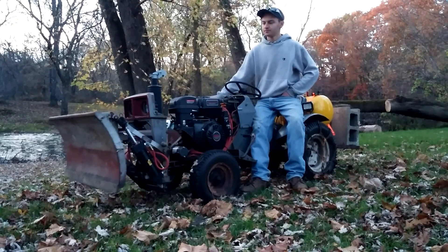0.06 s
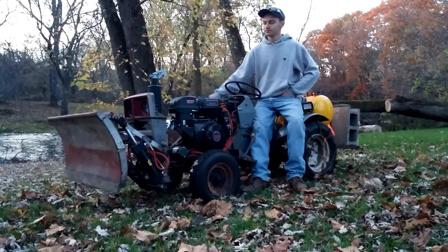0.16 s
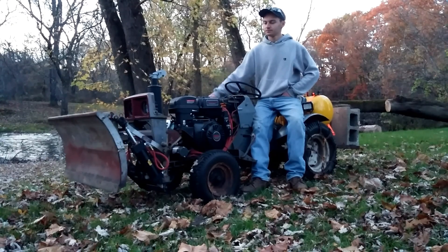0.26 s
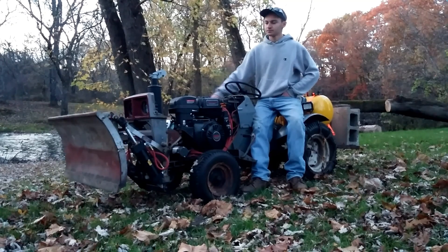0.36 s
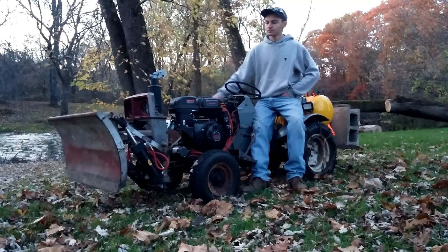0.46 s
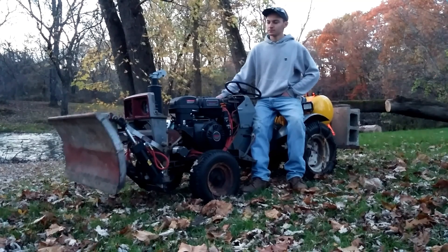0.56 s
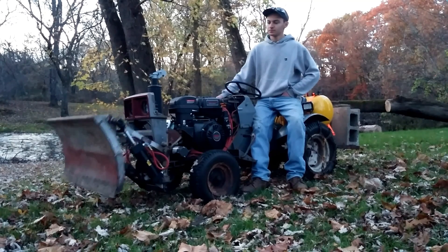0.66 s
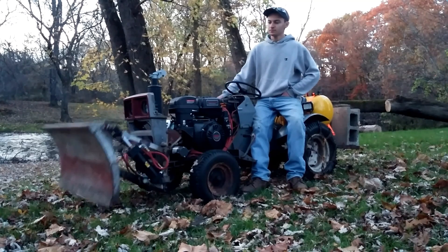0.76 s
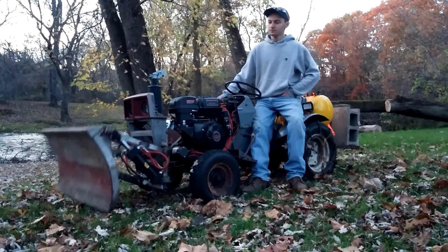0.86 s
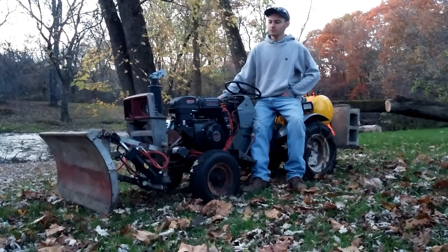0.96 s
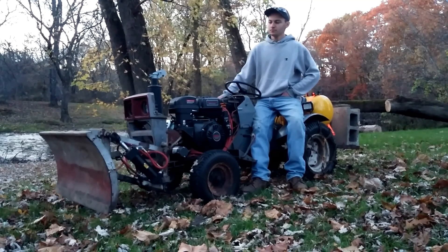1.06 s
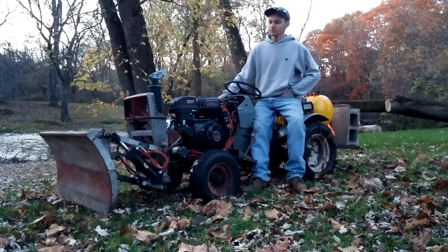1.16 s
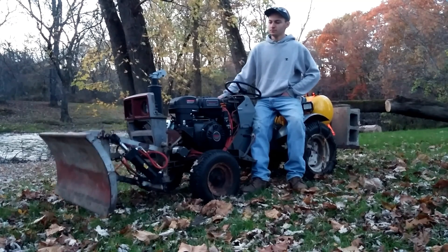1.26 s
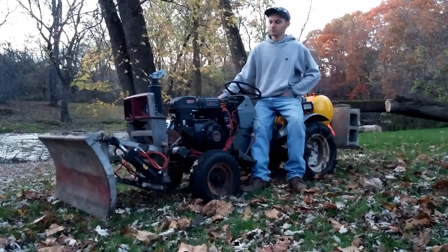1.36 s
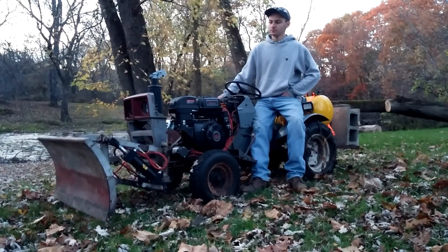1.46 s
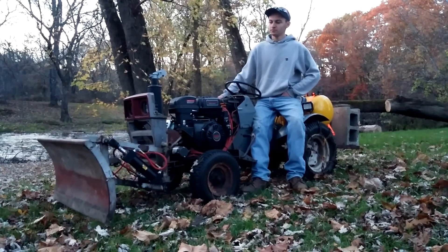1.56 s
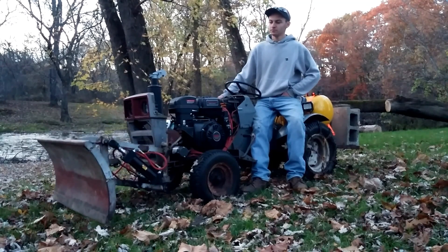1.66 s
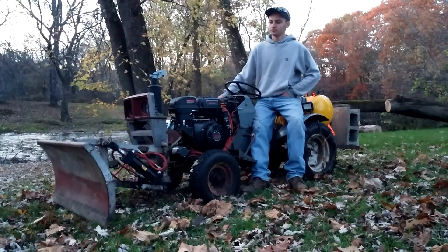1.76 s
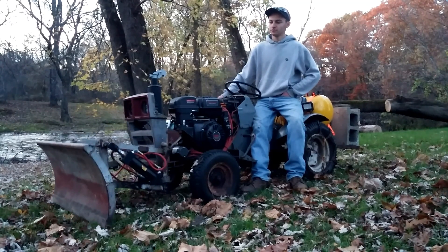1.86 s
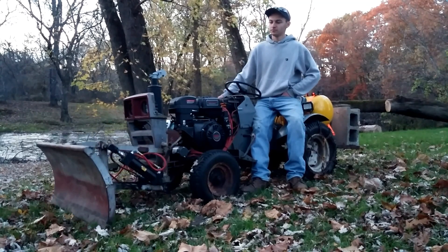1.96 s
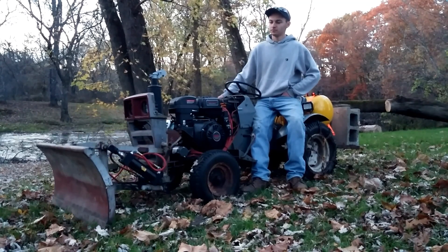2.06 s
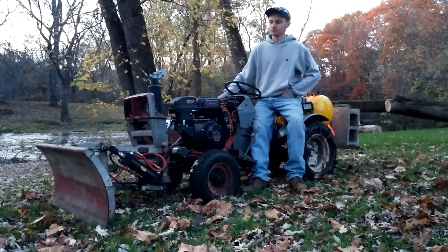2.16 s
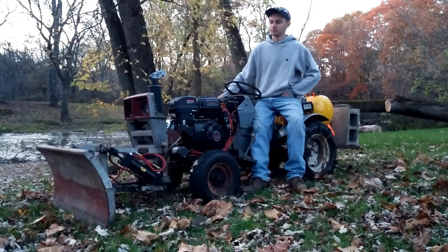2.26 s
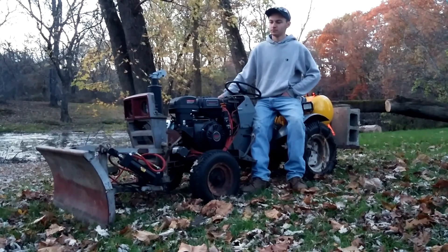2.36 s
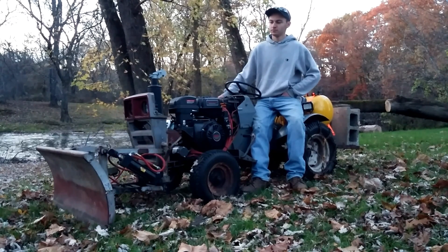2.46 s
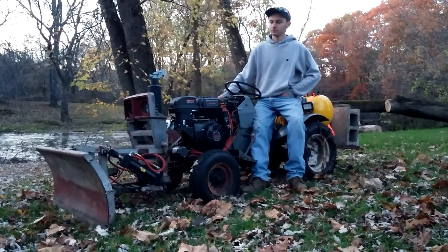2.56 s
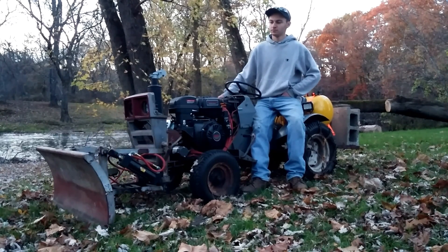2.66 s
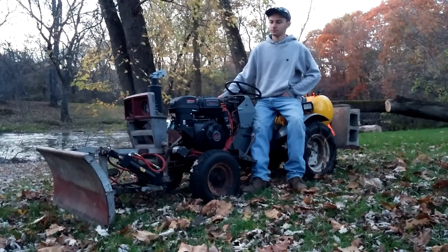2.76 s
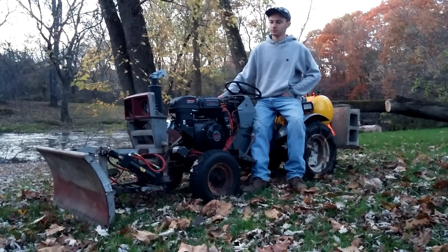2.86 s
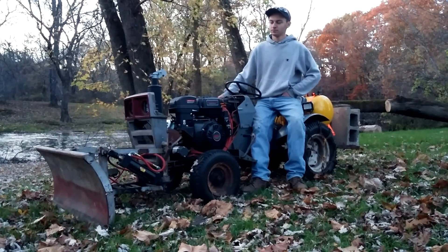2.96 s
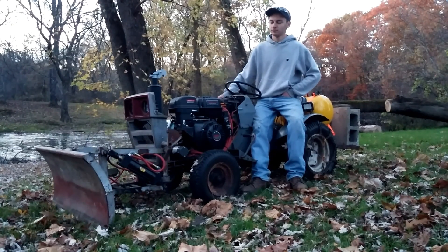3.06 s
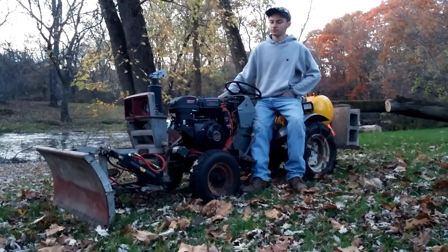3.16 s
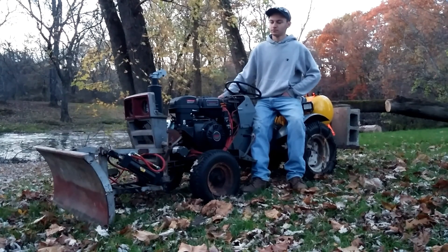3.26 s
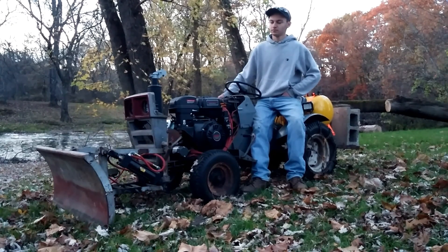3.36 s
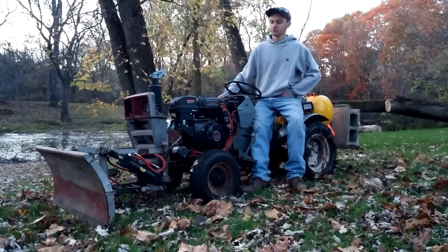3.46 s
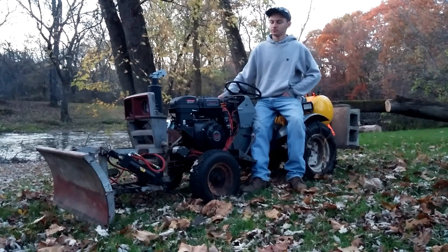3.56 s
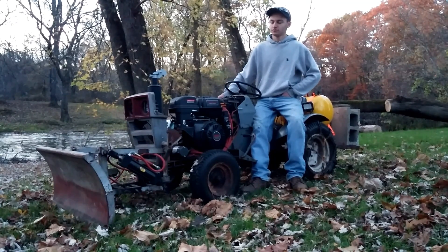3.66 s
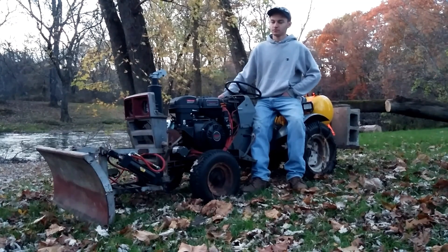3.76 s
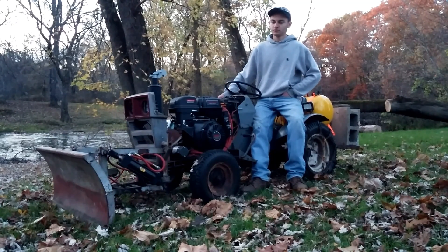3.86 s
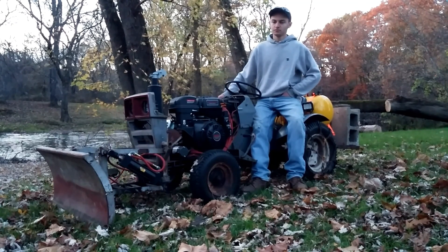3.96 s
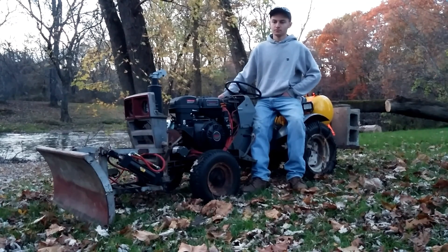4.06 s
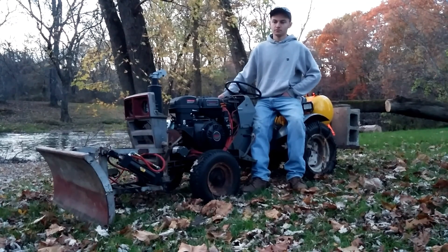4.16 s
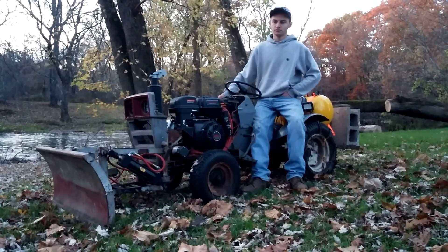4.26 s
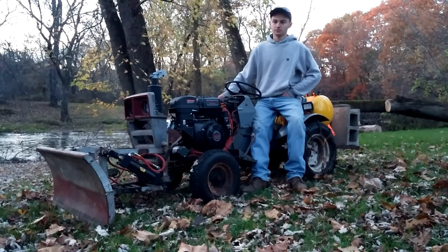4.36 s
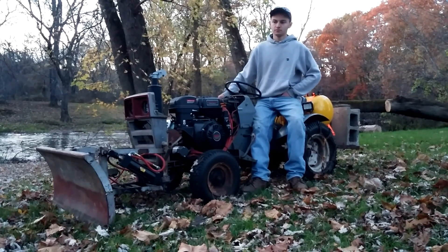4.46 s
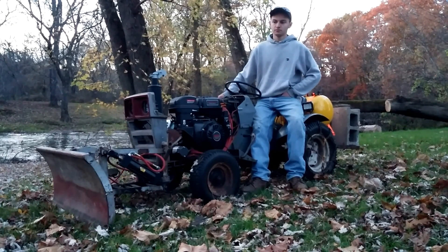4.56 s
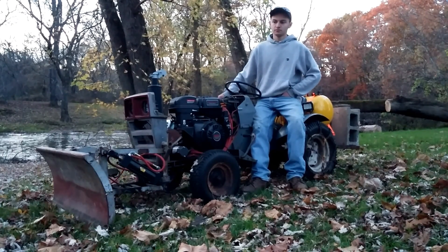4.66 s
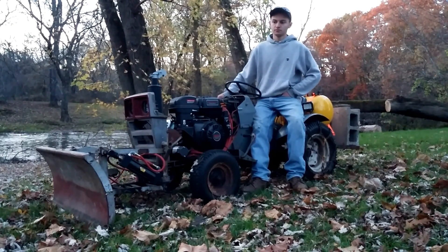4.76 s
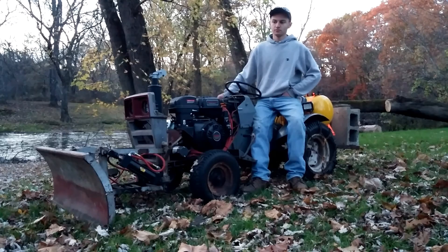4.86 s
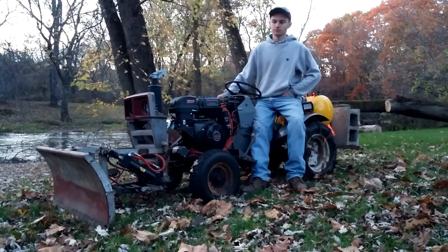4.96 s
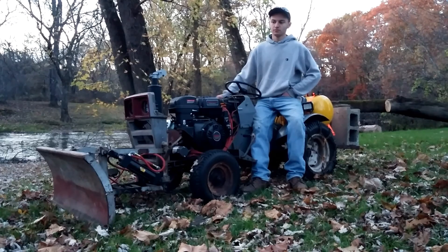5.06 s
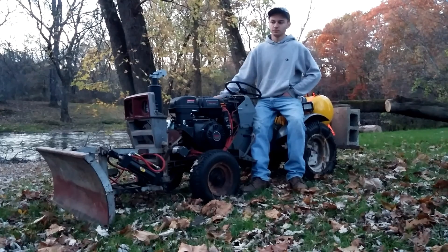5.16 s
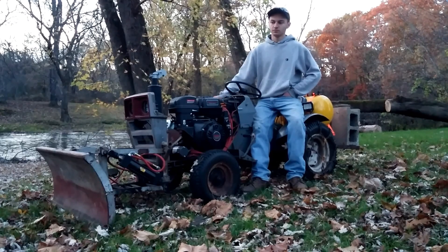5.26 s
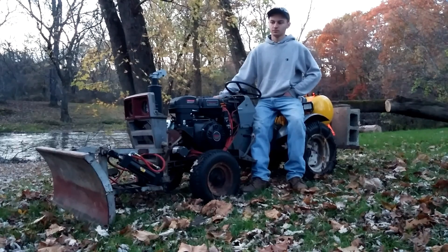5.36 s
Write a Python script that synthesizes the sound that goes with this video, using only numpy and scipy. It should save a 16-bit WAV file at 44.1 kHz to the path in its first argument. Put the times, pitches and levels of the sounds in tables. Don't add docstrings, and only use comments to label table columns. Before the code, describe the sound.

Close to a mono microphone in a wooded yard, a brief air hiss comes with sharp metal linkage clanks. A long, bright, whistly exhaust hiss follows, with duller knocks, then the steel blade lands hard and bounces in quickening, weakening bumps. A faint rubber rub ends the motion. The hiss fades away, leaving low distant traffic, wind and leaves, until a light knock and a fresh burst of air.

```python
import sys
import numpy as np
from scipy import signal
from scipy.fft import rfft, irfft, next_fast_len
from scipy.io import wavfile

SR = 44100
rng = np.random.default_rng(int(sys.argv[2]) if len(sys.argv) > 2 else 0)


def boost_factor(decibels):
    exponent = np.asarray(decibels, float) / 20
    return 10 ** exponent


def inscribe(sig):
    pcm = np.round(np.clip(np.atleast_2d(sig).T, -1, 1) * 32767)
    wavfile.write(sys.argv[1], SR, pcm.astype(np.int16))


N = 238845
CUTOFF_HZ = 15500

# (time [s], level [dB])
RUMBLE = [(0.0, -53.5), (0.69, -54), (1.27, -54.5), (2.1, -52), (3.4, -55), (3.8, -51.5), (4.5, -51),
          (5.0, -49), (5.42, -50)]


def rms_one(x):
    return x / np.sqrt(np.mean(x ** 2) + 1e-20)


def in_time(rows):
    s, *columns = np.transpose(rows)
    return [np.interp(np.arange(N) / SR, s, c) for c in columns]


def at_hz(points, hz, column=1):
    points = np.array(points)
    return np.interp(np.log(hz), np.log(points[:, 0]), points[:, column])


def decay(t60):
    return boost_factor(-60 / (t60 * SR))


def drift(rate_hz):
    r = np.exp(-2 * np.pi * rate_hz * 40 / SR)
    draws = rng.standard_normal(N // 40 + 2002)
    slow = signal.lfilter([1], [1, -2 * r, r * r], draws)[2000:]
    return np.interp(np.arange(N) / 40, np.arange(len(slow)), rms_one(slow))


def noise_bands(gain_of_hz, low_hz, count, length=N):
    size = next_fast_len(length)
    hz = np.arange(1, size // 2 + 2) * SR / size
    whole = rfft(rng.standard_normal(size)) * gain_of_hz(hz)
    step = np.log(CUTOFF_HZ / low_hz) / (count - 1)
    for centre in np.geomspace(low_hz, CUTOFF_HZ, count):
        away = abs(np.log(np.minimum(hz, CUTOFF_HZ) / centre)) / step
        yield centre, irfft(whole * np.clip(1 - away, 0, 1), size)[:length]


def ring(clicks, hz, t60):
    r, w = decay(t60), 2 * np.pi * hz / SR
    return signal.lfilter([0, np.sin(w)], [1, -2 * r * np.cos(w), r * r], clicks + 1e-18)


def yard():
    # (frequency [Hz], level [dB per Hz])
    yard_colour = [(15, -70), (25, -32.5), (75, 2), (169, -5.5), (215, -4.5), (398, -3.5), (507, -6),
                   (682, -22.5), (916, -9), (1700, -16), (2110, -17), (2910, -18.5), (3420, -26),
                   (3910, -26.5), (15400, -50.5)]
    traffic_db, middle_db, steady_db = 1.3, 0.5, -50.5
    low_db, = in_time(RUMBLE)

    def colour(hz):
        notch = 0.31 * np.exp(-((hz - 603) / 123) ** 2)
        return boost_factor(at_hz(yard_colour, hz)) * (1 - notch)

    gust, out, low = drift(2.6), 0, 0
    for hz, band in noise_bands(colour, low_hz=25.8, count=18):
        lumpy_db = np.interp(np.log(hz), np.log([300, 3000]), [2.6, 1.8]) * (0.25 * gust + drift(12))
        share_db = traffic_db * (170 < hz < 700) + middle_db * (700 < hz < 3200)
        share_db = share_db + (steady_db - low_db) * (hz > 3200)
        out = out + band * boost_factor(lumpy_db + share_db)
        low = low + band * (50 < hz < 160)
    return boost_factor(low_db + 1.07) * out / np.std(low)


def rustles(count):
    level_db, puff_s, spread_db = -9.5, 0.052, 2.5
    t = np.arange(int(puff_s * SR)) / SR
    out = np.zeros(N + SR)
    for when, pitch, glide, size in rng.random((count, 4)):
        hz = 850 * (3100 / 850) ** pitch * (1 + 0.1 * (glide - 0.5) * t / puff_s)
        size_db = -spread_db * np.log(1 - 0.95 * size)
        start = int(when * N)
        out[start:start + len(t)] += boost_factor(size_db) * np.hanning(len(t)) * np.sin(2 * np.pi * hz * t)
    return boost_factor(in_time(RUMBLE)[0] + level_db) * out[:N]


def seal():
    # (start [s], length [s], level [dB])
    drags = [(2.278, 0.16, -54), (2.46, 0.27, -52.5)]
    t = np.arange(N) / SR
    rubbing = sum(boost_factor(db) * np.sin(np.pi * np.clip((t - s) / length, 0, 1)) for s, length, db in drags)
    return rubbing * rms_one(ring(rng.standard_normal(N), hz=2560, t60=0.018))


def thump():
    t = np.maximum(np.arange(N) / SR - 0.175, 0)
    return boost_factor(-30.5 - 60 * t / 0.4) * (1 - np.exp(-t / 0.016)) * np.sin(2 * np.pi * 97 * t)


def jet(blast, flow_db, spectrum, peaks, port_db, patchy_db):
    opens, shuts, core_db, low_db, top_db = blast
    t = np.arange(N) / SR
    after = np.maximum(t - shuts, 0)
    opening = 1 - np.exp(-(np.maximum(t - opens, 0) / 0.0062) ** 2)
    closing = np.exp(-after / 0.018)
    hose_drain = boost_factor(-22.5) * np.exp(-after / 0.097)
    seat_leak = boost_factor(-28) * np.exp(-after / 0.91)
    valve = opening * (closing + hose_drain + seat_leak)

    low_db = low_db + np.clip(0.9 * (flow_db + 4.5), -9, 0)
    top_db = top_db - 0.0061 * flow_db
    lags_s = 0.012 * rng.random(8)

    def colour(hz):
        ports = 1 + sum(boost_factor(2 * (db + port_db)) / (1 + (2 * (hz - f) / wide) ** 2) for f, wide, db in peaks)
        paths = 1 + boost_factor(-17) * sum(np.exp(-2j * np.pi * hz * lag) for lag in lags_s)
        return boost_factor(at_hz(spectrum, hz)) * np.sqrt(ports) * paths

    bands = list(noise_bands(colour, low_hz=2200, count=12))
    core = np.std(sum(band for hz, band in bands if 6000 < hz < 9500))
    surge, out = drift(27.0), 0
    for hz, band in bands:
        low = np.interp(hz, [4800, 6000], [1, 0])
        top = np.interp(hz, [9000, 10500], [0, 1])
        edge_db = low * (low_db + 8.5) + top * (top_db + 3.5)
        wavering_db = patchy_db * (0.5 - 1.2 * top) * (0.38 * surge + drift(49.0))
        out = out + band * boost_factor(edge_db + wavering_db)
    return valve * boost_factor(core_db + flow_db) * out / core


def air():
    # (opens [s], shuts [s], core [dB], low edge [dB re core], top [dB re core])
    openings = [
        (-0.05, 0.13, -33.5, -8, 0.5),
        (0.695, 4.8, -32.5, -6, -4.5),
        (5.349, 5.5, -30, -10, 1.5),
    ]
    # (time [s], level [dB re full flow])
    emptying = [(0.7, -2), (1.22, 1), (1.4, -0.25), (2.62, 0.35), (3.07, -1.5), (3.86, -13.5), (4.31, -23),
                (4.65, -35.5), (4.8, -57)]
    # (frequency [Hz], level [dB per Hz])
    fill_colour = [(1470, -69), (2500, -44), (2910, -24), (3410, -22), (3680, -18.5), (4280, -5.5),
                   (5370, -9.5), (5970, -4.5), (7900, -1.5), (10700, -12), (15200, -13)]
    # (frequency [Hz], level [dB per Hz])
    exhaust_colour = [(1470, -29), (2500, -19.5), (2680, -16), (3180, -26.5), (4940, -5.5), (5620, -9),
                      (6100, -5), (7660, -6.5), (8330, -1), (9120, -7), (10800, -9), (11600, -7.5),
                      (12600, -8), (13600, -8), (15200, -4.5)]
    # (frequency [Hz], level [dB per Hz])
    refill_colour = [(1470, -41), (2500, -15), (3230, -15), (3880, -9.5), (5370, -7.5), (8390, -2.5),
                     (10600, -13.5), (11600, -14), (15200, -14.5)]
    # (frequency [Hz], width [Hz], level [dB])
    port = [(3600, 120, -1), (4170, 220, -7), (5400, 50, -37.5), (5300, 190, -9.5), (5860, 240, -4),
            (6320, 260, -6), (6870, 120, -3), (7520, 450, -3.5), (8416, 275, -1), (9190, 52, -0.5),
            (10200, 38, -25), (10270, 88, -4.5), (10900, 110, -6), (11400, 180, -5), (11800, 65, -12),
            (12500, 64, -17), (12400, 170, -15), (13300, 89, -5), (13600, 160, -12), (13700, 220, -8),
            (14800, 86, -22), (14800, 95, -28)]
    fill, exhaust, refill = openings
    out = jet(fill, 0, fill_colour, [], port_db=0, patchy_db=1.1)
    out = out + jet(refill, 0, refill_colour, [], port_db=0, patchy_db=1.1)
    return out + jet(exhaust, in_time(emptying)[0], exhaust_colour, port, port_db=9.0, patchy_db=0.98)


def struck(hits, modes, clatter, low_hz, high_hz, mode_db, clatter_db, spread_db, rise_s, favour_db):
    s, db, body_db, bright_db, rattle_s, near_hz = np.transpose(hits)
    first = int(s[0] * SR) - 10
    size = min(N, round((s[-1] + 1.2) * SR)) - first
    starts = np.round(s * SR).astype(int) - first
    t = np.arange(int(0.045 * SR)) / SR
    ragged_hz = 170
    noise = rng.standard_normal((len(hits), len(t)))
    luck = rng.standard_normal((len(hits), len(modes)))
    bunching = rng.standard_normal(int(SR / 2 / ragged_hz) + 2)
    shape = (1 - np.exp(-t / rise_s)) * np.exp(-t / np.maximum(rattle_s, 0.0015)[:, None])

    def blows(hz, extra_db, grain, ringing):
        body = np.interp(np.log(hz), np.log([low_hz / 2.15, low_hz]), [1, 0])
        bright = np.interp(np.log(hz), np.log([high_hz, high_hz * 1.4]), [0, 1])
        near_db = favour_db * np.exp(-(np.log(hz / near_hz) / 0.13) ** 2)
        level_db = db + body * body_db + bright * bright_db + near_db + extra_db
        force = grain * shape
        tuned = ringing * abs(force @ np.exp(2j * np.pi * hz * t))
        drive = np.hypot(tuned, np.linalg.norm(force, axis=1))
        train = np.zeros(size + len(t))
        for start, push in zip(starts, force * (boost_factor(level_db) / drive)[:, None]):
            train[start:start + len(t)] += push
        return train[:size]

    out = np.zeros(size)
    for k, (hz, level_db, t60) in enumerate(modes):
        grain = 0.99 * np.cos(2 * np.pi * (hz * t + luck[:, k:k + 1])) + noise
        out += ring(blows(hz, mode_db + level_db + spread_db * luck[:, k], grain, True), hz, t60)

    def colour(hz):
        ragged_db = 3 * np.interp(hz / ragged_hz, np.arange(len(bunching)), bunching)
        return boost_factor(at_hz(clatter, hz) + ragged_db)

    far = decay(0.77)
    for hz, band in noise_bands(colour, low_hz=145, count=14, length=size):
        r = decay(at_hz(clatter, hz, column=2))
        power = blows(hz, clatter_db, 1, False) ** 2 + 1e-18
        steel = signal.lfilter([1], [1, -r * r], power)
        trees = boost_factor(2 * -22) * signal.lfilter([1], [1, -far * far], power)
        out += band * np.sqrt(steel + trees)
    out = signal.sosfilt(signal.butter(3, [170, 12000], "band", fs=SR, output="sos"), out)
    return np.pad(out, (first, N - first - size))


def linkage():
    # (time [s], peak [dB], body [dB re
    # peak], # bright [dB re peak], loudest pin [Hz])
    clanks = [(0.1661, -11.5, 2, 1.5, 6700), (.1745, -9, 1, -2.5, 4250), (0.217, -34.5, 17.5, 1, 6500),
              (0.233, -38.5, 20, -2, 4120), (0.3173, -28, 5, 3, 2400), (0.3479, -13.5, -1.5, -2, 5440),
              (0.3528, -16.5, -27, -2.5, 8100), (.356, -16.5, -13, -13, 2200), (0.576, -32, -30, 1.5, 4600),
              (.695, -42.5, 5.5, 10, 1300), (0.828, -36, -2, -20, 412), (0.895, -20, 3.5, -19.5, 1384),
              (.903, -20, -6, -18, 1500), (0.926, -31, -13, -23, 1440)]
    # (frequency [Hz], level [dB], t60 [s])
    links = [(233.5, -12, 0.29), (269.4, -18, 0.41), (332, -13.5, 0.33), (391.5, -3, 0.31),
             (450, -10, 0.15), (872, -18, 0.39), (1055, -12.5, 0.12), (1300, -5, 0.11), (1680, -4.5, 0.084),
             (1620, -23, 0.096), (1990, -12, 0.14), (2244, -0.5, 0.049), (2390, -24, 0.085),
             (2670, -9, 0.074)]
    # (frequency [Hz], level [dB], t60 [s])
    pins = [(3900, -9, .05), (4100, -6, .07), (4300, -10, .04), (4600, -11, .035), (4970, -9, .045),
            (5150, -9, .05), (5400, -7, .06), (5650, -9, .045), (5900, -10, .035), (6300, -11, .03),
            (6800, -9, .03), (7100, -8, .035), (7400, -9, .03), (7800, -10, .03), (8200, -11, .025)]
    # (frequency [Hz], level [dB], t60 [s])
    link_clatter = [(149, -13, 0.6), (360, -0.5, 0.38), (643, -27, 0.62), (1110, -7.5, 0.18),
                    (2400, -7.5, 0.15), (4400, -16.5, 0.13), (7800, -28.5, 0.031), (9750, -30.5, 0.022),
                    (15000, -43, 0.034)]
    gaps = np.diff([row[0] for row in clanks] + [np.inf])
    hits = []
    for (s, db, body, bright, hz), gap in zip(clanks, gaps):
        rattle_s = 0.0038 if bright < -12 else 0.0016 if gap < 0.012 else 0.0045
        hits.append((s, db, body, bright, rattle_s, hz))
    return struck(hits, links + pins, link_clatter, low_hz=860, high_hz=3050, mode_db=-10, clatter_db=8.5,
                  spread_db=5.0, rise_s=0.00015, favour_db=14.5)


def blade():
    # (time [s], peak [dB])
    landings = [(1.7125, -13), (1.921, -29), (2.046, -14.5), (2.131, -17.5), (2.212, -19.5), (2.298, -21.5),
                (2.368, -26.5), (2.427, -31.5), (2.484, -33.5), (2.547, -33.5), (2.629, -42),
                (5.321, -36.5)]
    # (frequency [Hz], level [dB], t60 [s])
    panel = [(270, -12, .25), (325, -10, .25), (393, -7, .3), (445, -10, .2), (510, -12, .2),
             (624, -14, .25), (715, -14, .15), (797, -7, .22), (845, -17, .2), (920, -13, .2),
             (1035, -10, .15), (1150, -6, .1), (1195, -1, .14), (1255, -6, .12), (1350, -7, .12),
             (1440, -9, .1), (1815, -6, .12), (2055, -5, .07), (2290, -12, .12), (2470, -10, .1),
             (2720, -8, .07), (2900, -12, .08), (3500, -16, .06)]
    # (frequency [Hz], level [dB], t60 [s])
    blade_clatter = [(150, -18, 0.41), (364, 9, 0.2), (640, -10.5, 0.39), (1200, 6, 0.04),
                     (1930, -0.5, 0.11), (2690, -6, 0.062), (3670, -12.5, .05), (6000, -18, 0.042)]
    hits = []
    for s, db in landings:
        soft_db = -14 - db
        body_db = -8.5 + 0.57 * soft_db
        bright_db = max(-1.5 - 1.56 * soft_db, -13)
        rattle_s = 0.0028 + 0.00012 * soft_db
        for late_s, loss_db in [(0, 0), (0.0095, -3.5)]:
            hits.append((s + late_s, db + loss_db, body_db, bright_db, rattle_s, 1190))
    return struck(hits, panel, blade_clatter, low_hz=670, high_hz=1500, mode_db=-5, clatter_db=4.0,
                  spread_db=2.5, rise_s=0.00051, favour_db=-1.0)


def scene():
    background = yard() + rustles(count=160)
    tractor = seal() + thump() + linkage() + blade()
    return np.tile(background + tractor + air(), (2, 1))


def low_pass(x):
    return signal.sosfilt(signal.butter(12, 16650, fs=SR, output="sos"), x)


def record(dry):
    top, size = 0.5, next_fast_len(N + SR // 10)
    clipped = top * np.tanh((abs(dry) / top) ** 3) ** (1 / 3) * np.sign(dry)
    hz = np.arange(size // 2 + 1) * SR / size
    edge_db = np.interp(hz, [CUTOFF_HZ, CUTOFF_HZ + 150], [0, -90])
    cut = irfft(rfft(clipped, size) * boost_factor(edge_db), size)[:, :N]
    return low_pass(cut - 0.0008)


dry = scene()
out = record(dry)
inscribe(out)
```